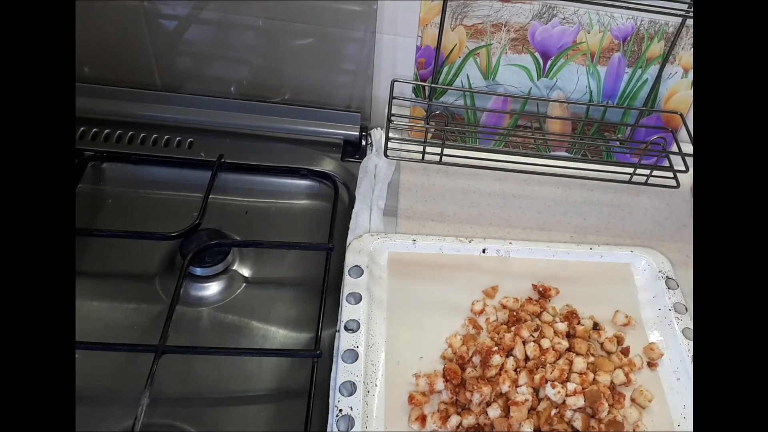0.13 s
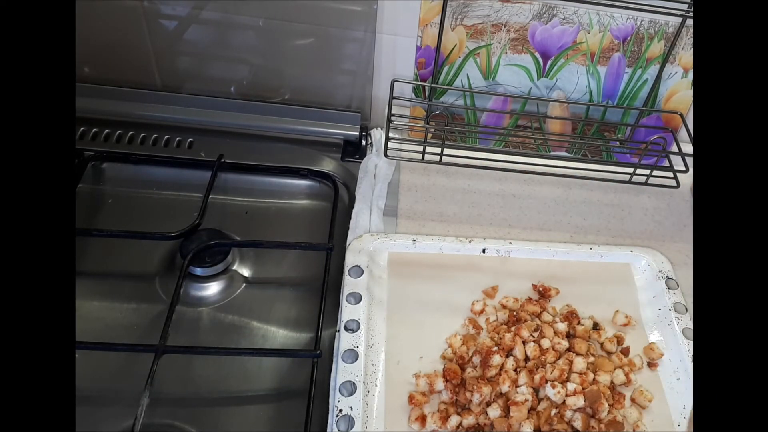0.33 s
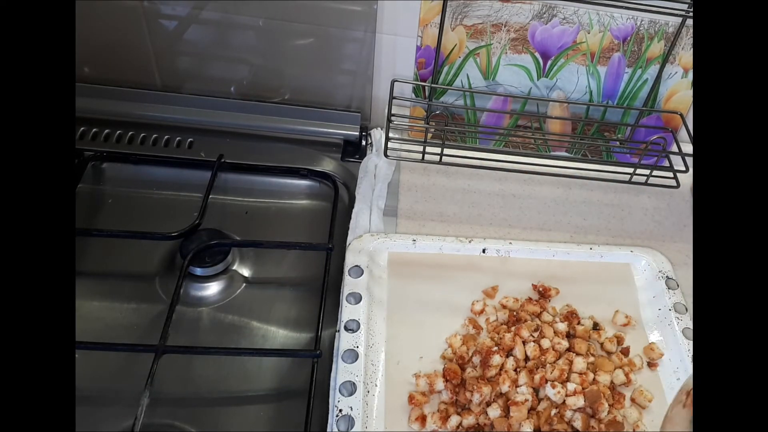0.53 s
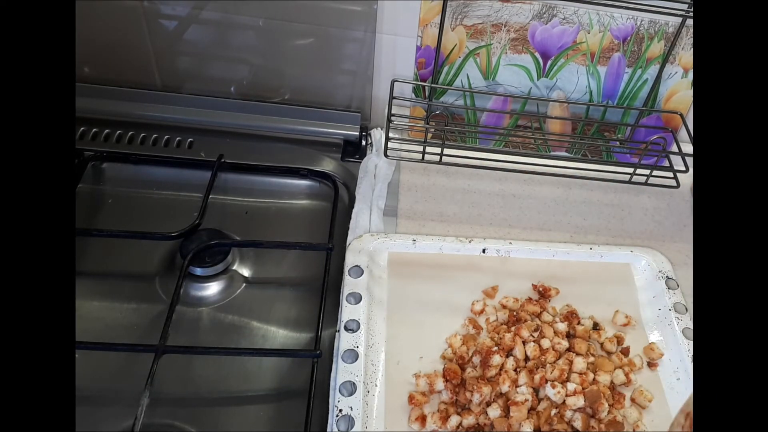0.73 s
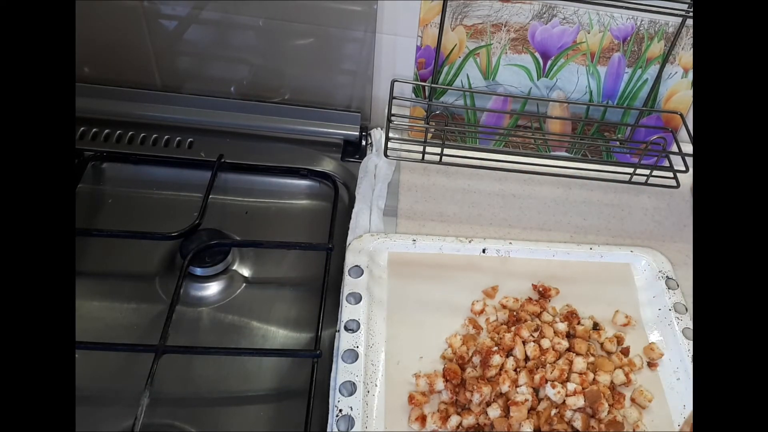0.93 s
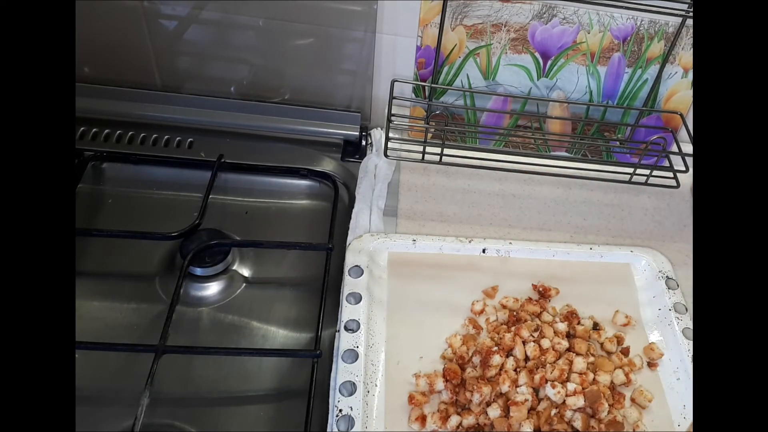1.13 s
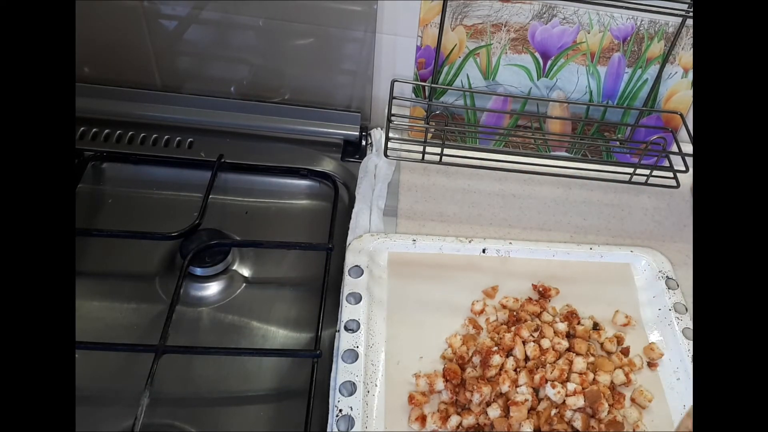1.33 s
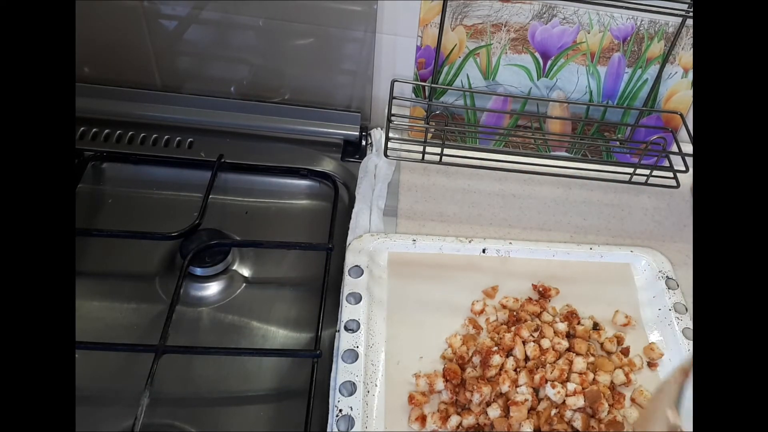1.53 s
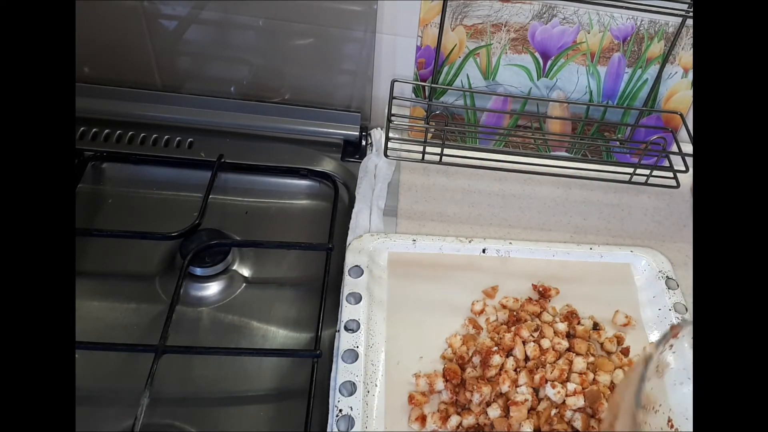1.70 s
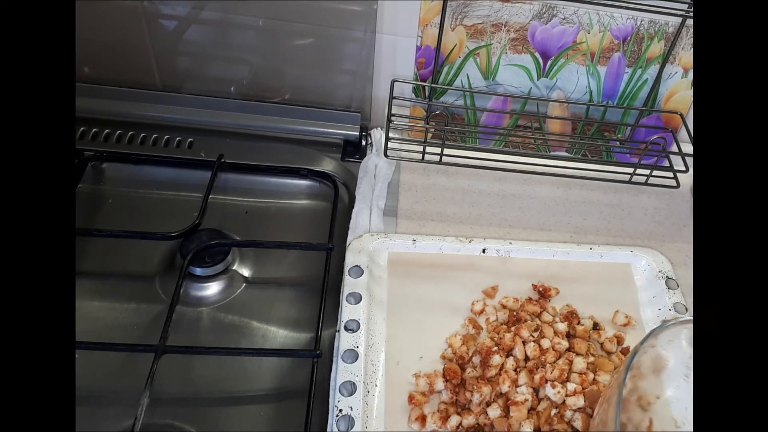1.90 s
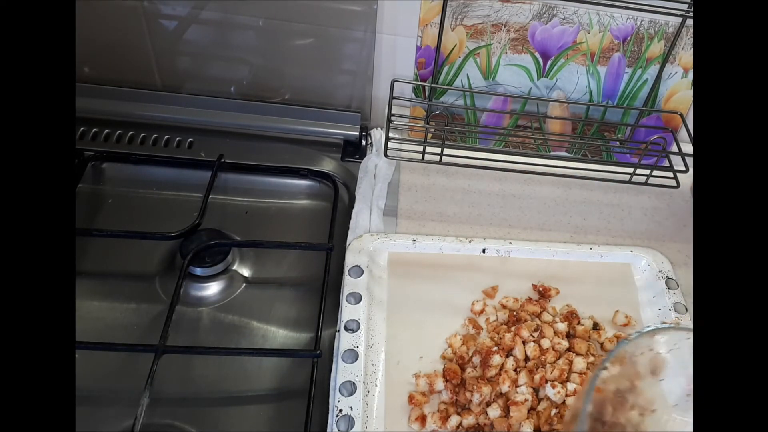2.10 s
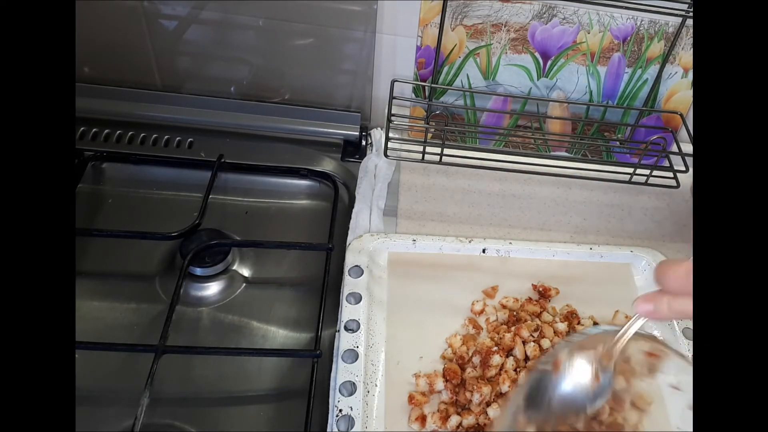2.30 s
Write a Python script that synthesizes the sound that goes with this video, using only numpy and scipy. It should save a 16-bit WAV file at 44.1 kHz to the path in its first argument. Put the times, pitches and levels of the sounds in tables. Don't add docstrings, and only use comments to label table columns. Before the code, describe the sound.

Kitchenware knocks, close in a small hard-walled kitchen with a low wavering appliance drone. Dry croutons shift at 0.2-0.3 s, with soft thuds to 0.45. A cup is set down at 0.8, cutlery clinks faintly at 1.0, a tray lands with sharp taps at 1.15 and settles by 1.3. After near quiet and a faint hand rub on glass, a spoon strikes a bowl loudly at 2.2 and 2.4.

```python
import sys
import numpy as np
from scipy import signal
from scipy.fft import rfft, irfft, next_fast_len
from scipy.io import wavfile
from scipy.ndimage import uniform_filter1d

SR = 44100
rng = np.random.default_rng(int(sys.argv[2]) if len(sys.argv) > 2 else 0)


def master_out(mix):
    frames = np.transpose(np.atleast_2d(mix))
    ceiling = np.clip(frames, -1, 1)
    pcm = np.round(ceiling * 32767).astype(np.int16)
    wavfile.write(sys.argv[1], SR, pcm)


def gain_from_decibels(decibels):
    exponent = np.asarray(decibels, float) / 20
    return 10 ** exponent


N = 108133


def evened(x):
    return x / np.sqrt(np.mean(x ** 2) + 1e-20)


def read(points, hz):
    f, value = np.transpose(points)
    return np.interp(np.log(hz + 1), np.log(f + 1), value)


def curve(points, t):
    rows = np.transpose(points)
    return [np.interp(t, rows[0], column) for column in rows[1:]]


def add(mix, s, sound):
    part = mix[:, round(s * SR):][:, :sound.shape[1]]
    part += sound[:, :part.shape[1]]


def coloured(x, points, size=4096):
    hz = abs(np.fft.fftfreq(size, 1 / SR))
    below = np.log((hz + 1) / points[0][0]).clip(-5, 0) * 2
    above = np.log((hz + 1) / points[-1][0]).clip(0, 5) * 4
    log_gain = np.log(gain_from_decibels(read(points, hz))) + below - above
    taps = np.fft.ifft(np.exp(np.conj(signal.hilbert(log_gain)))).real[:size // 2]
    return signal.oaconvolve(x, taps)[:len(x)]


def resonate(x, hz, width_hz):
    turn = np.exp(2j * np.pi * np.cumsum(hz * np.ones(len(x))) / SR)
    r = np.exp(-np.pi * width_hz / SR)
    return 2 * (turn * signal.lfilter([1 - r], [1, -r], x / turn)).real


EVEN_HZ = 90


def balanced(pair):
    size = 2 * pair.shape[-1]
    z = np.fft.fft(pair, size)
    power = abs(z.reshape(-1, size).mean(axis=0)) ** 2
    smooth = uniform_filter1d(power, int(EVEN_HZ * size / SR), mode="wrap")
    log_gain = -.5 * np.log(smooth + 1e-9)
    return np.fft.ifft(z * np.exp(np.conj(signal.hilbert(log_gain)))).real[..., :size // 2]


# (frequency [Hz], correlation [0-1])
PORT_LIKENESS = [(60, 0.89), (200, 0.91), (500, 0.36), (1500, 0.068)]
# (frequency [Hz], level [dB])
LEFT_OVER_RIGHT = [(60, 3), (250, 1.5), (2000, 2.25)]


def ports(a, b):
    size = 2 * next_fast_len(len(a) // 2 + 1)
    hz, a_z, b_z = np.fft.rfftfreq(size, 1 / SR), rfft(a, size), rfft(b, size)
    likeness = np.clip(read(PORT_LIKENESS, hz), 0, 1)
    tilt = gain_from_decibels(read(LEFT_OVER_RIGHT, hz) / 2)
    right = likeness * a_z + np.sqrt(1 - likeness ** 2) * b_z
    return irfft([a_z * tilt, right / tilt], size)[:, :len(a)]


# (frequency [Hz], decay time t60 [s])
ROOM_DECAY = [(200, 0.35), (530, 0.36), (1400, 0.46), (3700, 0.35), (9000, 0.23), (15000, 0.22)]
BUILD_S, DIRECT_DB = .001, -20
EARLY_S, EARLY_DB = 0.0016, -6.5


def room(x):
    size = SR // 2
    hz, t, z = signal.stft(rng.standard_normal((2, size)), SR, nperseg=256)
    decay = gain_from_decibels(-60 * t / read(ROOM_DECAY, hz)[:, None])
    tail = signal.istft(z * decay, SR, nperseg=256)[1][:, :size]
    since = np.arange(size) / SR
    tail = tail * (1 - np.exp(-since / BUILD_S))
    tail = tail * (1 + gain_from_decibels(EARLY_DB) * np.exp(-since / EARLY_S))
    tail = tail / np.linalg.norm(tail[0])
    tail[:, 0] += gain_from_decibels(DIRECT_DB)
    padded = np.pad(tail, ((0, 0), (256, 0)))
    return signal.fftconvolve(x[None], balanced(ports(*padded)[:, 256:]), axes=1)


# (frequency [Hz], spectral density [dB per Hz])
AIR_COLOUR = [(15, -46), (25, -54.5), (114, 1.5), (212, -10.5), (301, -12), (1650, -21.5), (6050, -30.5),
              (7920, -39), (16000, -25)]
AIR_DB = -68.5
# (time [s], level [dB])
STIR = [(0, 0.5), (.7, 2), (1.4, 2.5), (1.55, -3), (1.75, -0.5), (2.15, 2)]
# (frequency [Hz], width [Hz], level [dB])
WHINES = [(7920, 87, -76.5), (7680, 420, -75.5), (13000, 47, -91), (15600, 40, -87)]
# (time [s], level [dB])
DRONE = [(0.0, -61), (0.13, -63), (0.47, -54.5), (0.8, -63.5), (0.88, -50), (0.93, -67), (1.18, -54),
         (1.75, -67.5), (1.77, -56.5), (1.9, -61), (1.93, -71), (2.01, -54), (2.07, -72), (2.09, -62.5),
         (2.25, -58), (2.3, -77), (2.37, -56.5), (2.45, -59)]
DRONE_HZ, DRONE_WIDTH_HZ = 89.4, 9


def kitchen():
    size = N + N % 2
    t = np.arange(size) / SR
    drone_db, = curve(DRONE, t)
    stir_db, = curve(STIR, t)
    pair = []
    for noise in rng.standard_normal((size, 2)).T:
        drone = resonate(resonate(noise, DRONE_HZ, DRONE_WIDTH_HZ), DRONE_HZ, 30)
        drone = drone / np.sqrt(uniform_filter1d(drone ** 2, 2500) + 1e-12)
        whine = 0
        for hz, width_hz, db in WHINES:
            whine = whine + gain_from_decibels(db) * evened(resonate(resonate(noise, hz, width_hz), hz, 3 * width_hz))
        air = evened(coloured(noise[::-1], AIR_COLOUR, size=8192))
        pair.append(gain_from_decibels(AIR_DB + stir_db) * air + gain_from_decibels(drone_db + 1.24) * drone + whine)
    return ports(*pair)[:, :N]


# (time [s], level [dB], brightness [0-1])
SHIFT = [(.215, -54.5, 0.08), (.233, -41.5, 0.26), (.255, -47, 0.47), (.27, -43.5, 1), (.32, -124, 0),
         (.37, -62, 0.1), (.442, -97, 0), (.445, -53.5, 0.3), (.5, -85, 0.3), (.56, -92, 0.3)]
# (frequency [Hz], spectral density [dB per Hz])
DULL = [(110, -5), (180, -3.5), (350, 0.5), (520, -2.5), (800, -20.5), (1800, -11), (5000, -28)]
BRIGHT = [(88, -30), (150, -12), (453, -8.5), (1320, -29), (3040, -7.5), (4480, -13.5), (7000, -9),
          (15500, -22.5)]
# (frequency [Hz], width [Hz], level [dB])
HOLLOWS = [(350, 170, -6), (740, 200, -11), (1780, 250, -12), (2050, 150, -15), (2670, 200, -13),
           (3140, 200, -11), (5600, 1200, -15), (10800, 600, -20)]
GRAINS_PER_S = 6800


def croutons():
    t = np.arange(0, .6, 1 / SR)
    level_db, bright = curve(SHIFT, t)
    hits = rng.random((len(t), 2)) < GRAINS_PER_S / SR
    ticks = gain_from_decibels(2.96 * rng.exponential(1, (len(t), 2))) * hits
    ticks = ticks * rng.choice([-1., 1.], ticks.shape)
    muffled, sliding = ticks.T
    mix = (1 - bright) * evened(coloured(muffled, DULL))
    mix = mix + bright ** 2 * evened(coloured(sliding, BRIGHT))
    for hz, width_hz, db in HOLLOWS:
        hollow = resonate(resonate(sliding, hz, width_hz), hz, 2 * width_hz)
        mix = mix + bright * gain_from_decibels(db) * evened(hollow)
    return room(gain_from_decibels(level_db) * (t > SHIFT[0][0]) * mix)


WAVER_DB, WAVER_HZ = 5, 34


def waver(t):
    hz = WAVER_HZ * rng.uniform(.3, 1.4, (2, 3, 1))
    turn = rng.random((2, 3, 1))
    return WAVER_DB * np.sin(2 * np.pi * (hz * t + turn)).sum(axis=1) / np.sqrt(3)


FAR_SHARE = 0.61


def knock(thing, strength_db, contact_s, far_db, near_db):
    colour, modes = thing
    t = np.arange(SR // 2) / SR
    chatter = rng.standard_normal(len(t)) * gain_from_decibels(3.4 * rng.exponential(1, len(t)))
    chatter = chatter * np.exp(-t / contact_s)
    chatter[0] += np.linalg.norm(chatter) * 0.66
    crack = evened(coloured(balanced(chatter), colour))
    far, near = 0, 0
    for hz, db, t60 in modes:
        far = far + gain_from_decibels(db - 60 * t / (t60 * FAR_SHARE)) * np.sin(2 * np.pi * hz * t)
        cycles = hz * t + rng.random() + np.array([[0], [.22]])
        near = near + gain_from_decibels(db + waver(t) - 60 * t / t60) * np.sin(2 * np.pi * cycles)
    sound = room(crack + gain_from_decibels(far_db) * evened(far))[:, :len(t)]
    near = ports(*(near * np.minimum(t / 0.0011, 1)))
    head = SR // 20
    sound = sound / sound[:, :head].std()
    near = near / near[:, :head].std()
    return gain_from_decibels(strength_db) * (sound + gain_from_decibels(near_db) * near)


CUP = ([(88, -49), (150, -19), (486, -6), (1050, -12), (2060, -3), (2400, -16), (3090, -1), (3970, -15),
        (15000, -48)], [ (705, -16, .25), (1599, -10, .25), (2003, -6, .25), (3005, -10, .2),
        (3150, 0, .25), (3180, -3, .25), (3285, -8, .2), (3400, -13, .2), (5200, -14, .2)])
CUTLERY = ([(450, -40), (700, -8), (1200, -26), (3400, -2), (4500, -26), (5600, -20), (6800, -7),
            (15500, -26)], [ (3424, -5, .25), (6083, -3, .25), (6112, -1, .25), (7117, -6, .3),
            (7779, -8, .12), (7940, -9, .21), (9415, -7, .25), (10500, -7, .22), (11250, -5, .2),
            (11500, -5, .25), (14870, -11, .2)])
TRAY = ([(59, -45), (140, -9), (350, -3), (774, -10), (1300, -4), (2370, -12), (3390, -7), (15500, -28)],
         [ (325, -4, .2), (660, -10, .25), (1370, -2, .2), (3050, -1, .35), (3350, -1, .35), (3620, -4, .3),
         (4264, -1, .35), (7704, -16, .15)])
REBOUND = ([(88, -27), (150, -7), (1310, -5.5), (2570, -12), (3030, -3.5), (12000, -35.5), (15600, -88),
            (22000, -120)], [(671, -1, 0.24), (1217, -1, 0.23), (1323, 7.5, 0.067), (2976, -3, 0.21),
            (3660, -3.5, 0.3), (4446, -2.5, 0.25)])
CRUMB = ([(2000, -14), (3600, -16.5), (8000, -14), (11000, -34)], [(3650, 0, 0.031)])
BOWL = ([(200, -30), (330, -19), (450, -24), (700, -11), (1150, -14), (3000, -10), (8000, -12),
         (16000, -23)], [ (700, -14, .3), (940, -13, .3), (1703, -10, .3), (1730, -10, .35), (2610, 0, .45),
         (2640, -1, .45), (2668, -2, .35), (2736, -10, .35), (3655, -8, .35), (3701, 2, .5),
         (4804, -6, .38), (4872, -8, .38), (4904, -4, .35), (5060, -5, .3)])
RIM = ([(250, -40), (500, -24), (800, -12), (3000, -9), (7500, -14), (16000, -30)], [ (680, -13, .2),
        (875, -16, .2), (1590, -3, .2), (3105, 0, .12), (3965, -3, .2), (4940, -7, .3), (6275, -6, .15),
        (7400, -8, .15), (7820, -6, .2), (13360, -16, .1)])
SETTLE = ([(100, -24), (350, 1), (700, -7), (1370, -6), (3390, -6), (5000, -13.5), (9000, -25.5)],
           [(392, -8, 0.2), (1298, -1.5, 0.21), (3350, 0, 0.19)])
THUD = ([(120, -12), (200, 0.5), (350, 4.5), (600, 3), (900, -23), (2000, -25), (5000, -30)],
         [(356, 2, 0.1), (560, -18, 0.055)])
# (frequency [Hz], level [dB], decay time t60 [s])
SPOON = [(4037, -12, .2), (6207, -8, .25), (6290, -10, .15), (7585, -8, .14), (8228, -8, .2),
         (9792, -16, .2), (12120, -12, .15), (12610, -11, .18), (13570, -13, .16)]
# (time [s], strength [dB], contact [s], ring in the room [dB], ring heard straight [dB])
KNOCKS = [
    (0.8202, -34.5, 0.0041, -5, -15),
    (1.0105, -51, 0.00043, -6, -1.5),
    (1.1335, -28, 0.014, -5, -11.5),
    (1.316, -42.5, 0.011, -8, 0.5),
    (1.573, -65, 0.0005, -22, -8.5),
    (2.1819, -19, 0.0051, -6, 0.54),
    (2.4243, -19.5, 0.0019, -8.5, -1.5),
    (1.215, -34, 0.017, -6.5, -16),
    (.303, -53, 0.0035, -18, -5),
    (.442, -56, 0.0033, -4, -29),
]


def knocks():
    mix = np.zeros((2, N))
    bowl_and_spoon = BOWL[0], BOWL[1] + SPOON
    things = [CUP, CUTLERY, TRAY, REBOUND, CRUMB, bowl_and_spoon, RIM, SETTLE, THUD, THUD]
    for thing, (s, *how) in zip(things, KNOCKS):
        add(mix, s, knock(thing, *how))
    return mix


# (time [s], peak level [dB])
TAPS = [(1.1392, -19), (1.1435, -22), (1.152, -24), (1.156, -23)]
# (frequency [Hz], spectral density [dB per Hz])
TAP_COLOUR = [(700, -20), (1500, -4), (3500, 0), (8000, -6), (15000, -14)]
TAP_DB = -3


def taps():
    x = np.zeros(SR // 2)
    for s, db in TAPS:
        x[round((s - TAPS[0][0]) * SR)] = gain_from_decibels(db + TAP_DB)
    x = coloured(x, TAP_COLOUR)
    x = x / abs(x).max() * gain_from_decibels(max(db for s, db in TAPS) + TAP_DB)
    return x * gain_from_decibels([[1.2], [-1.2]]) + gain_from_decibels(-15.0) * room(x)[:, :len(x)]


# (time [s], level [dB], resonance [Hz])
SLIDE = [(1.72, -92.5, 1385), (1.82, -81.5, 1390), (1.92, -80, 1800), (2.01, -75.5, 1680),
         (2.07, -77.5, 1620), (2.12, -73.5, 1490), (2.17, -71, 1500)]
SLIDE_WIDTH_HZ, UPPER_RATIO, UPPER_DB = 70, 1.25, -5


def hand():
    t = np.arange(SLIDE[0][0], SLIDE[-1][0] + 0.0062, 1 / SR)
    level_db, hz = curve(SLIDE, t)
    rub = []
    for noise in rng.standard_normal((len(t), 2)).T:
        lower = evened(resonate(noise, hz, SLIDE_WIDTH_HZ))
        upper = evened(resonate(noise, hz * UPPER_RATIO, 440))
        rub.append(lower + gain_from_decibels(UPPER_DB) * upper)
    return gain_from_decibels(level_db + 5.5) * np.minimum((t - t[0]) / 0.047, 1) * ports(*rub)


def scene():
    mix = kitchen()
    add(mix, 0, croutons())
    add(mix, 0, knocks())
    add(mix, TAPS[0][0], taps())
    add(mix, SLIDE[0][0], hand())
    return mix


EDGE_HZ, EDGE_DB = 15900, -55
CEILING = 1.3


def band_limit(x):
    return signal.sosfilt(signal.butter(12, 16580, fs=SR, output="sos"), x)


def record(dry):
    size = 2 ** 18
    hz = np.fft.rfftfreq(size, 1 / SR)
    edge = gain_from_decibels(EDGE_DB / (1 + np.exp((EDGE_HZ - hz) / 100)))
    mic = irfft(rfft(dry, size) * edge)[:, :N]
    return band_limit(CEILING * np.tanh(mic / CEILING))


dry = scene()
out = record(dry)
master_out(out)
```